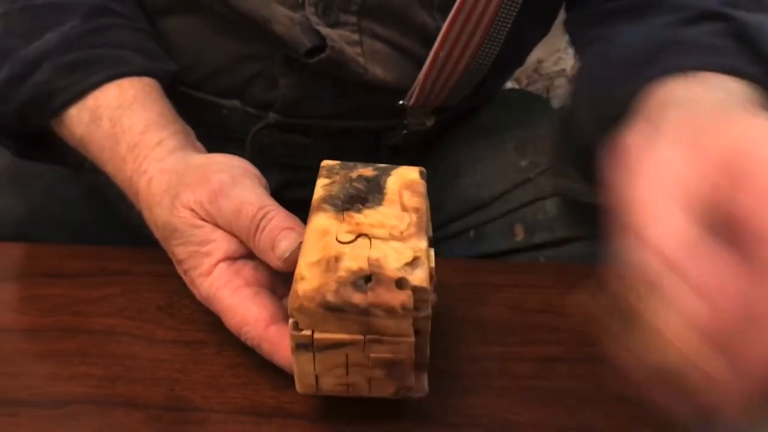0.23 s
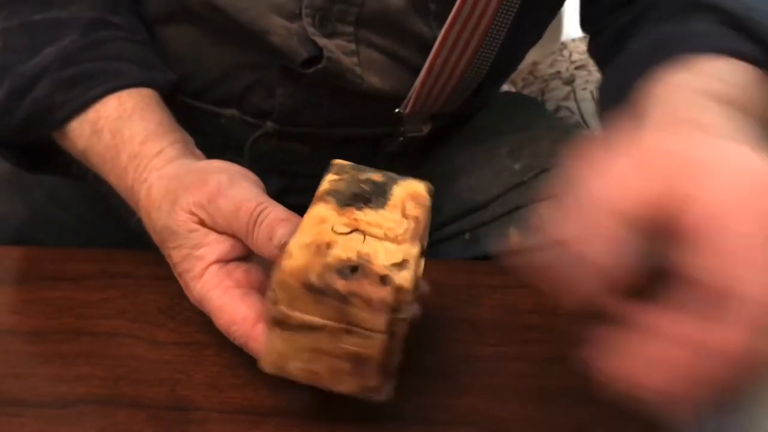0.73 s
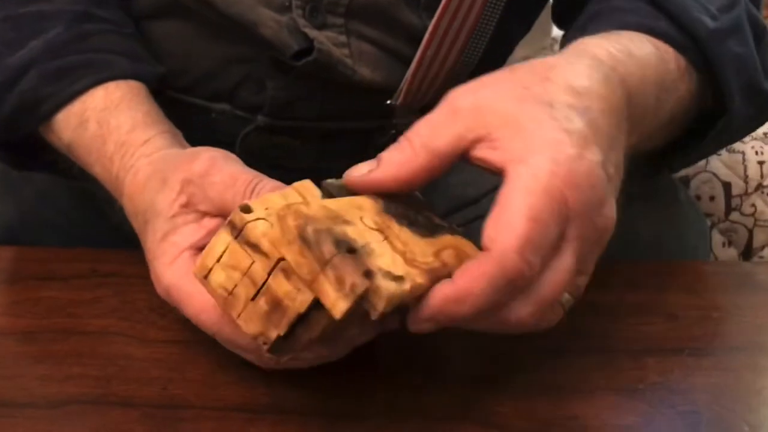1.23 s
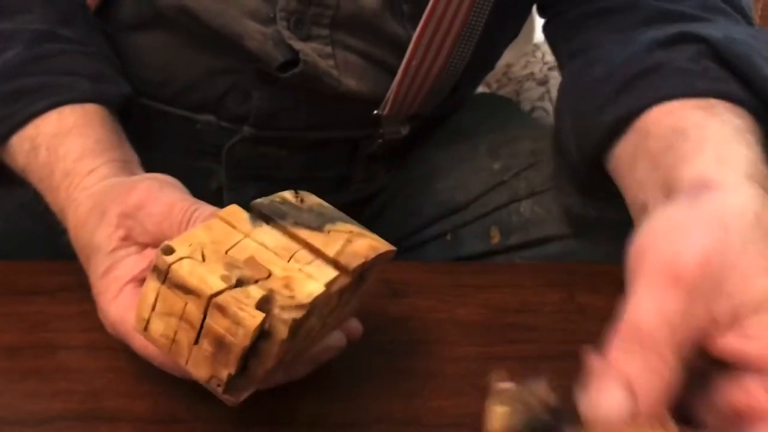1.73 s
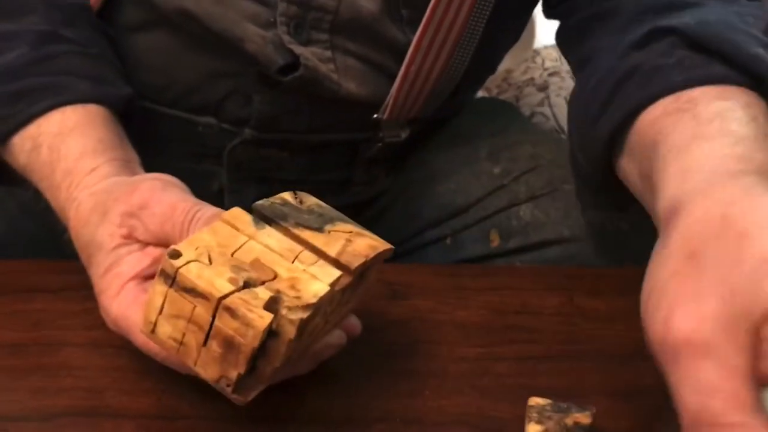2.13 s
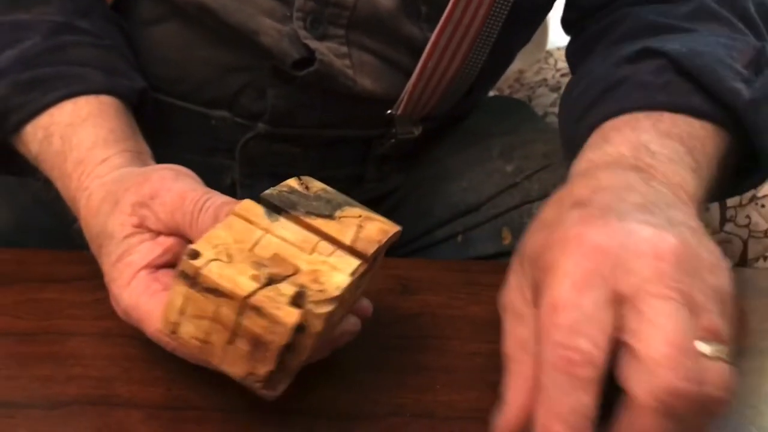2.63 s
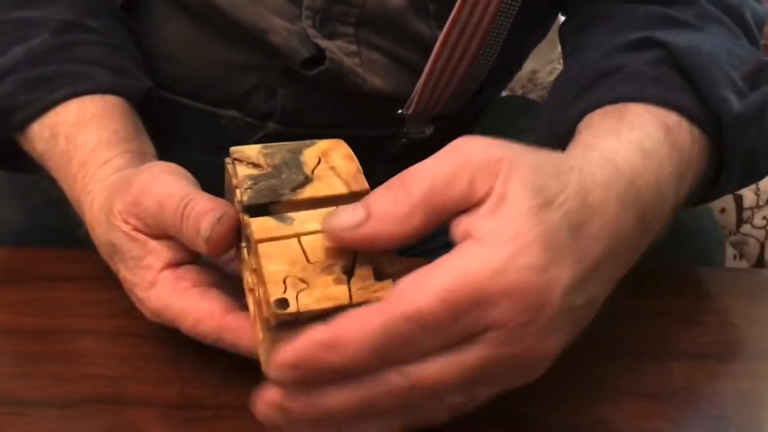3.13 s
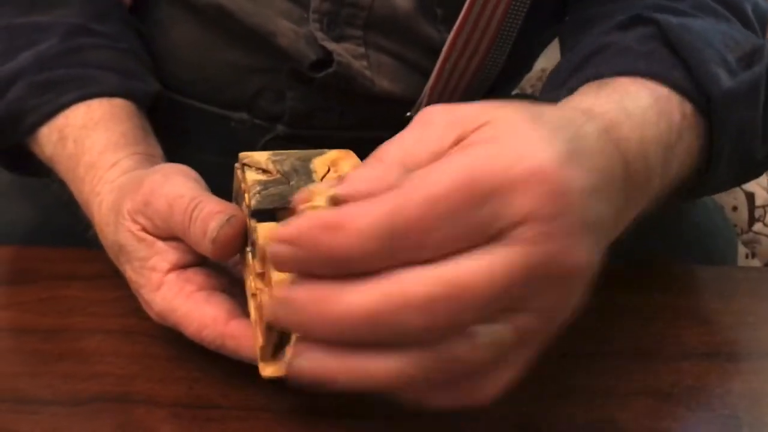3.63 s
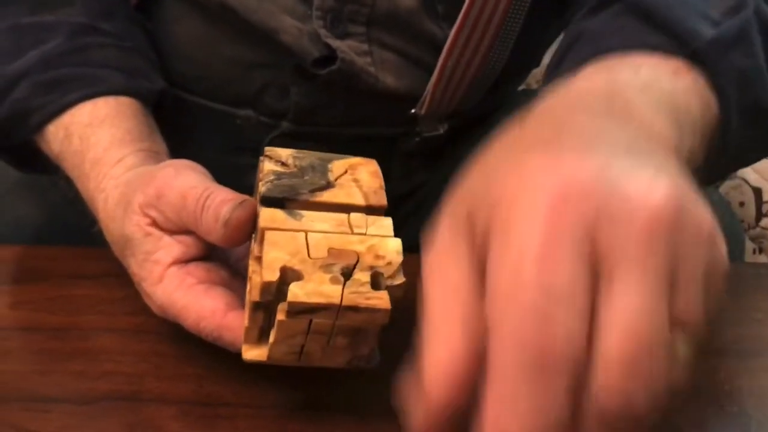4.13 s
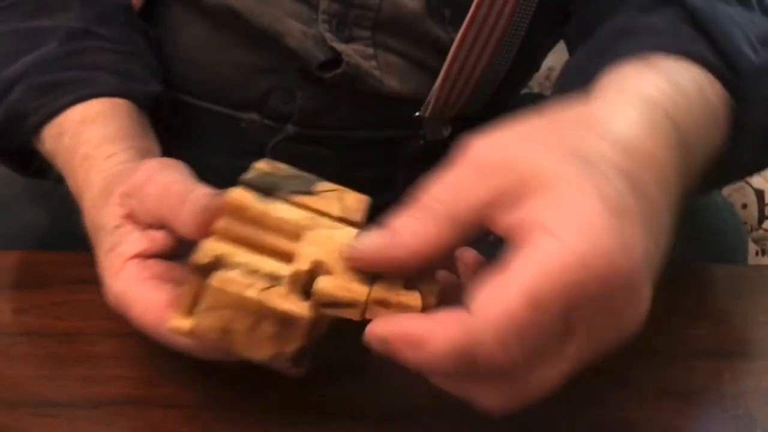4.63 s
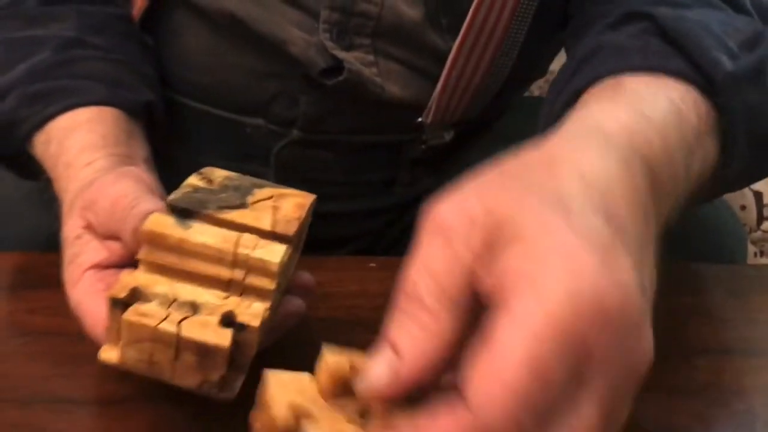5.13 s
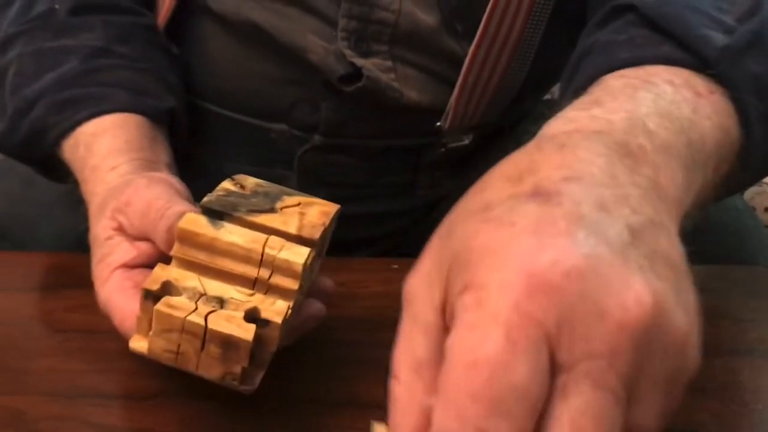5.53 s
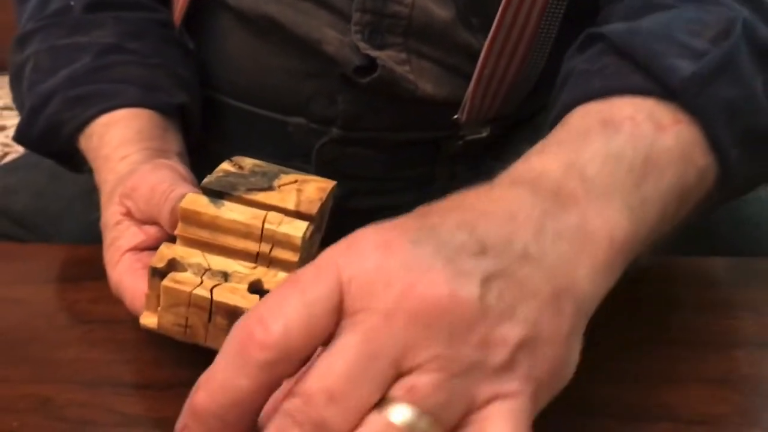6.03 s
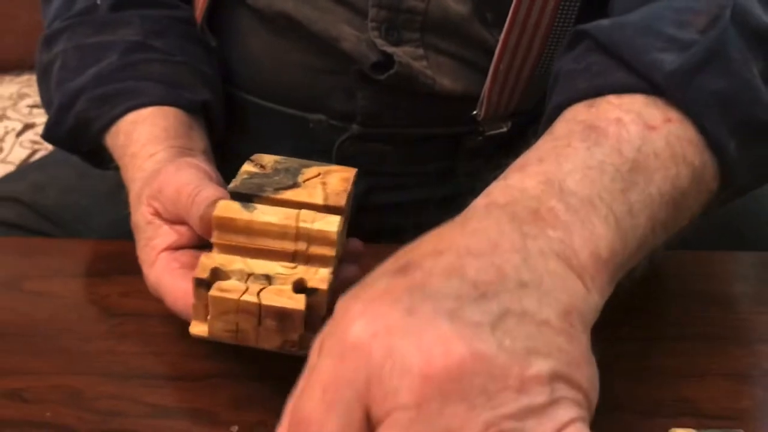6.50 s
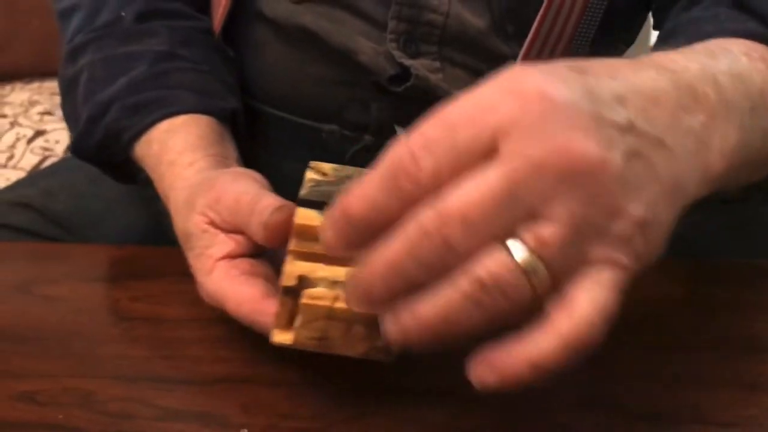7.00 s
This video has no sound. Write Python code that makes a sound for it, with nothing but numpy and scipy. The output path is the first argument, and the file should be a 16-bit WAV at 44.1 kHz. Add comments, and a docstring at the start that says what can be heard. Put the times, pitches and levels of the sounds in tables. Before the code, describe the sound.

Hands pull apart a small wooden puzzle over a wooden table. A few light clicks and brief scrapes lead to a quick clatter, then sharp knocks as a piece lands and bounces. More short bunches of clicks and clacks follow, separated by pauses with faint rubbing of wood, skin and sleeves. It sounds close, in a small room, with a soft low rumble underneath.

```python
"""Wooden puzzle blocks click together, land and bounce as hands pull them apart over a wooden table.
Each impact excites damped modes of the piece and the tabletop, and a small room reverberates.
Between impacts, friction of wood, skin and sleeve gives a soft hiss and short gritty strokes.
Underneath, the table murmurs below the hands, a rumble wavers, and jogs of table or arm swell deeply."""
import sys
import numpy as np
from scipy import signal
from scipy.fft import rfft, irfft, next_fast_len
from scipy.io import wavfile
from scipy.ndimage import uniform_filter1d, map_coordinates

SR = 44100
rng = np.random.default_rng(int(sys.argv[2]) if len(sys.argv) > 2 else 0)


def unload_audio(sound):
    """Save the sound as a 16-bit wav file, at the path given as the first command line argument."""
    columns = np.transpose(np.atleast_2d(sound))
    # keep every value between -1 and 1, then stretch to whole-number steps
    steps = np.round(np.clip(columns, -1, 1) * 32767)
    wavfile.write(sys.argv[1], SR, steps.astype(np.int16))


N = 320166

# Handling. Each row: time in seconds, then levels in dB of wood on wood, skin on wood and sleeve hiss.
RUB_LEVELS = [(0.0, -78, -85, -85), (0.34, -77.5, -74.5, -72.5), (0.83, -71, -84, -81),
              (1.21, -77, -68, -75), (1.48, -66, -68, -82), (1.6, -68, -76, -65), (1.84, -72.5, -77.5, -78),
              (2.45, -71, -76, -79), (2.69, -71.5, -79.5, -76.5), (3.19, -74.5, -70, -73),
              (3.46, -72, -64, -67.5), (4.33, -76.5, -83.5, -85.5), (4.49, -77.5, -69, -68.5),
              (4.77, -68, -82.5, -85), (5.09, -78.5, -78.5, -78), (5.28, -69.5, -73, -76),
              (5.96, -70, -79, -93), (6.41, -76, -70.5, -72), (6.81, -72.5, -85.5, -88),
              (7.26, -83.5, -78, -85)]
# The table under the hands. Each row: time in seconds, murmur level in dB.
MURMUR_LEVELS = [(0.0, -78.5), (0.36, -78), (0.51, -70), (1.11, -78.5), (1.62, -60), (2.04, -66.5),
                 (2.3, -65), (2.55, -68.5), (2.75, -69), (3.62, -72), (4.04, -72.5), (4.51, -74.5),
                 (5.11, -78), (5.26, -72.5), (6.41, -72), (7.26, -80)]
# Noise spectra. Each row: frequency in Hz, relative spectral density in dB.
SLIDE_SPECTRUM = [(400, -20.5), (800, 0), (1500, 0), (2600, 0), (3600, -7), (5000, -12.5)]
RUMBLE_SPECTRUM = [(12, -21.5), (25, -1.5), (40, 5.5), (60, -0.5), (90, -5), (130, -34.5)]
MURMUR_SPECTRUM = [(80, -15.5), (150, -1), (180, 2), (215, -8), (300, -6), (400, -12.5), (700, -18.5),
                   (1000, -47.5)]
# Resonances of skin on wood and of fine skin and sleeve hiss. Each row: centre in Hz, width in Hz,
# gain in dB.
SKIN_PEAKS = [(4130, 3300, -8.5), (5730, 870, -3.5), (6300, 620, -2), (7320, 770, -9)]
HISS_PEAKS = [(8100, 690, -0.5), (9550, 1100, 0.5), (11300, 660, -0.5), (12800, 1600, -10.5)]
# A piece or finger drawn along wood. Each row: start in seconds, length in seconds, then level in dB
# and centre in Hz for each of the low, middle and high bands.
STROKES = [(0.079, 0.23, -74.5, 2820, -74, 7160, -69.5, 10100),
           (0.843, 0.14, -62.5, 1790, -74, 4440, -67, 9600),
           (1.033, 0.071, -64.5, 2580, -62, 4770, -61, 9700),
           (1.189, 0.18, -59.5, 1170, -59, 4570, -58, 9800),
           (1.293, 0.061, -56, 2540, -76, 4240, -56.5, 10000),
           (1.358, 0.095, -60, 2580, -62.5, 4760, -61.5, 9500),
           (1.452, 0.074, -83, 2410, -70, 5430, -61, 11300),
           (1.792, 0.055, -84, 1540, -73, 4820, -74, 9470), (2.102, 0.017, -68, 1550, -62, 5050, -84, 8500),
           (2.159, 0.036, -81, 1380, -68.5, 4850, -83.5, 8270),
           (2.46, 0.17, -62, 1120, -67, 5100, -62, 9650),
           (2.895, 0.11, -71.5, 1610, -74.5, 3940, -67, 9100),
           (4.274, 0.081, -68.5, 1060, -72, 5870, -76, 8400),
           (4.32, 0.082, -70.5, 3750, -62, 5510, -60.5, 7840),
           (4.386, 0.036, -63.5, 3620, -62, 5500, -69, 8200),
           (4.443, 0.018, -74, 3100, -51, 5770, -60, 8000),
           (4.447, 0.085, -69.5, 1380, -63.5, 5900, -62.5, 8300),
           (4.499, 0.048, -66.5, 895, -67.5, 4740, -70, 11370),
           (4.556, 0.044, -68, 1220, -52.5, 5630, -52, 10800),
           (4.576, 0.078, -72, 3620, -61, 6700, -63, 11370),
           (4.762, 0.15, -66, 1570, -93, 4200, -101, 9500),
           (5.003, 0.091, -95.5, 2600, -75, 6400, -71, 11020),
           (6.102, 0.047, -71, 3100, -73, 6300, -74, 9200),
           (6.643, 0.053, -71.5, 1200, -93, 4460, -92, 9300),
           (7.013, 0.067, -83.5, 2590, -76.5, 4300, -87.5, 9020),
           (7.123, 0.043, -92.5, 1035, -77, 5190, -89.5, 8400)]
# Jogs of the table or an arm. Each row: time of the crest in seconds, level in dB.
JOGS = [(0.241, -84), (0.42, -63), (1.29, -62), (1.43, -43.5), (1.485, -48.5), (1.6, -49), (1.7, -54),
        (1.8, -51), (2.06, -53), (2.53, -59), (2.771, -73), (3.35, -80), (3.659, -57), (3.97, -45.5),
        (6.57, -54.5), (6.75, -67)]
# Impacts. Each row: start in seconds, nominal peak in dB, low and high emphasised frequencies in Hz,
# then relative drive in dB of 4-7 kHz, of 8-12 kHz, of the table's middle modes and of its boom.
IMPACTS = [(0.3687, -48.5, 3340, 9350, -7, -12, -6, -0.5), (0.3978, -46, 1690, 8700, -19, -16, -4, -34),
           (0.431, -43, 1690, 10700, -29, -10, -9, -21), (0.443, -23, 3200, 9020, -7.5, -4.5, -15.5, -45),
           (0.4751, -32, 3080, 9000, -8, -19, -17, -19), (0.4813, -29.5, 2950, 9250, -6, -8.5, -27, -37),
           (0.4892, -33, 3060, 10000, -15, -10, -6.5, -35), (0.4987, -32, 2940, 4400, -9, -17, -28, -15),
           (0.5107, -33, 2560, 9100, -4, -8, -11.5, -28), (0.9628, -38.5, 2560, 4330, -6.5, -14, -15, -27),
           (1.0267, -43.5, 2560, 4600, 3, -27, -29, -40), (1.0542, -33.5, 2640, 4370, 5, -7, -21, -51),
           (1.1706, -51, 1340, 11300, -20, -18, 4.5, -8), (1.265, -46.5, 1500, 4500, -12.5, -25, -2, -19.5),
           (1.2939, -31.5, 3420, 4220, 4.5, -10, -12, -29.5),
           (1.3, -15.5, 2150, 4300, -35, -43.5, -18.5, -30),
           (1.4103, -41.5, 1550, 5550, -1.5, -24, -8.5, -17),
           (1.4375, -24.5, 2320, 4220, -15, -28.5, -12, -19),
           (1.4833, -37, 2500, 5500, 2.5, -16.5, -17, -20.5),
           (1.504, -51.5, 1010, 10180, -10, 6, -9.5, -31),
           (1.5118, -40.5, 1080, 9560, -19.5, -19.5, -19.5, -28),
           (1.542, -44, 1020, 4400, 6.5, -12.5, -4, -12.5), (1.5714, -17, 2010, 4500, -10, -14, 2.5, -6.5),
           (1.6012, -11, 1240, 4330, -6.5, -24, -12.5, -31.5),
           (1.6214, -14, 2240, 4340, -8.5, -19.5, -26, -20.5),
           (1.644, -19, 2120, 4300, -21, -21.5, -11, -28), (1.6633, -29.5, 1140, 4310, -16, -23, -16, -25),
           (1.682, -24, 2350, 5320, -15, -18, -12, -20.5), (1.6887, -17, 2050, 4420, -11.5, -38, -16, -24),
           (1.7018, -28.5, 2430, 4330, -17, -42, -0.5, -18), (1.71, -34, 2720, 4860, -3, -30, -26, -19),
           (1.73, -30.5, 1470, 5130, -14, -47, -6, -3), (2.0431, -21, 1320, 5000, -16, -19, -2.5, -11),
           (2.0609, -35.5, 1730, 4500, -32.5, -25.5, -1, -31),
           (2.2206, -9.5, 2920, 8500, -1.5, -15, -15, -18.5),
           (2.2759, -10, 3880, 5040, -16, -24, -16, -30.5), (2.2911, -29, 2150, 4300, -3, -19, -10.5, -15),
           (2.306, -30, 1420, 4290, -12, -17, -25.5, -32), (2.3705, -49, 3500, 11000, 9, -7, -16, -19),
           (2.434, -27, 2700, 5400, -19.5, -23, -5, -14.5), (2.461, -44, 1100, 4500, -20, -30, 12, 2),
           (2.6546, -38, 1110, 5400, -12, -44, -4.5, -5), (2.676, -53, 1110, 4500, -10, -32, 4, 12),
           (3.318, -45.5, 1620, 8700, 1, -5, -11, -17), (3.5196, -32, 3680, 4250, 1, -14, -21, -45),
           (3.938, -26, 3010, 7200, -15, -17, -20.5, -25), (3.956, -11.5, 2770, 4560, 5, 3, -26, -34.5),
           (3.9886, -33, 2580, 5560, -11, -3, -25.5, -16), (3.995, -24.5, 2540, 7190, 6, -3.5, -16.5, -47),
           (4.002, -38.5, 2500, 5000, 5, 2, -19.5, -31), (4.028, -24.5, 2100, 6960, 9.5, 0.5, -19, -27.5),
           (4.0322, -31, 3730, 4540, -14, -39, -18.5, -19), (4.06, -35, 2640, 4700, -4, -12, -21, -57),
           (4.406, -36, 3260, 5400, 7, -10.5, -58, -38), (4.415, -46.5, 2160, 4220, -16, -15, -23, -36),
           (4.449, -48, 1310, 5500, 13, 12, -21, -44), (5.1428, -13, 2500, 6230, -13, -28, -11.5, -24),
           (5.155, -19.5, 2630, 6350, -7, -14.5, -13.5, -14.5),
           (5.1689, -18.5, 1640, 6200, -5.5, -17.5, -12.5, -46.5),
           (5.2921, -37, 1500, 4220, -27, -27, -2.5, -19), (5.301, -41.5, 2900, 4210, -25, -31, 0.5, -13.5),
           (5.339, -42, 1500, 7000, -11, -19, -8.5, -32.5),
           (5.6306, -20.5, 3440, 5740, -15.5, -16.5, -21, -20.5),
           (5.6337, -15, 2540, 5750, -3, -31, -18.5, -33.5), (5.6474, -17.5, 3880, 4520, -2, -6, -18, -25),
           (5.6557, -32, 1400, 5320, -11, -28.5, -15.5, -27), (5.688, -14, 2960, 5100, 0, -43, -33, -27.5),
           (5.706, -30, 3400, 4300, -6, -9, -10, -33), (5.7179, -26, 3830, 4570, -5, -16.5, -15, -22),
           (6.0108, -44, 1510, 7340, -12, -14, -0.5, -8), (6.269, -44, 1420, 9260, -19, -24, 4.5, -4),
           (6.414, -54.5, 1240, 4500, -7, -17, 1, -14), (6.4745, -26.5, 1440, 5490, 0.5, -18, -13.5, -21.5),
           (6.4947, -37, 1350, 5360, -16, -22, -30, -14)]
# Modes of a piece and of the tabletop. Each row: frequency in Hz, gain in dB, 60 dB decay in seconds.
PIECE_MODES = [(1140, -9.5, 0.031), (1432, 6, 0.033), (1730, 9, 0.018), (2140, 5, .025), (2560, 3, 0.045),
               (2820, 2.5, 0.027), (3100, 0.5, 0.036), (3448, 4, 0.014), (3924, 5.5, 0.026),
               (4500, 6.5, 0.014), (5075, 6, 0.0044), (6460, -11.5, 0.013), (6870, -14.5, 0.011),
               (7800, -3, 0.0077), (8490, 5.5, 0.0082), (10160, -6, 0.0023)]
TABLE_MID_MODES = [(445, -4, 0.038), (533, -8.5, 0.025), (637, 1.5, 0.04), (730, -10, 0.034),
                   (830, -8.5, 0.041), (891, -9.5, 0.075), (1055, -6, 0.08)]
TABLE_BOOM_MODES = [(110, -8, 0.08), (179.4, -7.5, 0.49), (190.1, -1, .2), (212.4, -3, 0.11),
                    (277.6, -5, 0.12), (331, -5.5, 0.073), (398, -3.5, 0.053)]
# Room reverberation. Each row: frequency in Hz, 60 dB decay in seconds.
ROOM_T60 = [(200, 0.7), (700, .34), (1900, 0.29), (4800, 0.17), (12000, 0.094)]
# Microphone response. Each row: frequency in Hz, gain in dB.
MICROPHONE = [(1000, 0), (4300, 0.5), (4900, -2.5), (5500, 1), (6000, -5), (6600, -3), (7700, -2.5),
              (8400, -3), (8800, 0.5), (9400, 0), (10400, -5.5), (11300, -3.5), (12500, -7), (14000, -7),
              (16400, -17.5)]


def amp(db):
    """Decibels to amplitude ratio."""
    return 10 ** (np.asarray(db) / 20)


def unit(x):
    """Normalisation to rms 1."""
    return x / np.sqrt(np.mean(x ** 2) + 1e-20)


def along(points, hz):
    """Interpolation of (Hz, value) points on a logarithmic frequency axis."""
    point_hz, values = np.transpose(points)
    return np.interp(np.log(hz + 1), np.log(point_hz + 1), values)


def curves(rows):
    """Linear interpolation, per sample, of each column after the time."""
    times, *columns = np.transpose(rows)
    return [np.interp(np.arange(N) / SR, times, column) for column in columns]


def wobble(rate):
    """A smooth random curve with rate knots a second."""
    return map_coordinates(rng.standard_normal(int(N * rate / SR) + 4), [np.arange(N) * rate / SR])


def filtered(x, response):
    """Linear filtering: the spectrum is multiplied by a frequency response."""
    size = next_fast_len(N + SR // 2)
    return irfft(rfft(x, size) * response(np.fft.rfftfreq(size, 1 / SR)), size)[..., :N]


def resonance(f, hz, width):
    """Band-pass response of a damped oscillator."""
    return 1j * f * width / (hz * hz - f * f + 1j * f * width)


def peaks(modes):
    """Response of resonators in parallel, alternating in polarity."""
    return lambda f: sum((-1) ** k * amp(db) * resonance(f, hz, width)
                         for k, (hz, width, db) in enumerate(modes))


def place(starts, rows):
    """Superposition of sounds at their starts in seconds."""
    at = np.round(starts * SR).astype(int) + np.arange(rows.shape[1])
    return np.bincount(at.ravel(), rows.ravel(), N + SR)[:N]


def friction(response, grit_db, patchy_db):
    """Friction noise of rms 1: fibres catch unevenly, and the spectrum shifts as the grip moves."""
    catches = rng.standard_normal(N) * amp(grit_db * wobble(220))
    spectra = signal.stft(catches, nperseg=256)[2]
    patches = uniform_filter1d(rng.standard_normal(spectra.shape), size=4, axis=0)
    patches = unit(uniform_filter1d(patches, size=14, axis=1))
    patched = signal.istft(spectra * amp(patchy_db * patches), nperseg=256)[1][:N]
    return unit(filtered(patched, response))


def rubbing():
    """Sliding friction: wood on wood gives broad noise, skin and sleeves hiss in resonant bands."""
    slide_db, skin_db, hiss_db = curves(RUB_LEVELS)
    slide = amp(slide_db) * friction(lambda f: amp(along(SLIDE_SPECTRUM, f)), grit_db=1.0, patchy_db=2.5)
    skin = amp(skin_db) * friction(peaks(SKIN_PEAKS), grit_db=-0.5, patchy_db=-0.5)
    hiss = amp(hiss_db) * friction(peaks(HISS_PEAKS), grit_db=1.0, patchy_db=2.5)
    return slide + skin + hiss


def rumble():
    """Random amplitude modulation makes a deep noise waver."""
    level = amp(-68.5 + 2.5 * wobble(rate=8.9))
    return level * friction(lambda f: amp(along(RUMBLE_SPECTRUM, f)), grit_db=-0.2, patchy_db=2.5)


def table_murmur():
    """Forced vibration: moving hands drive the table with low noise."""
    level = amp(curves(MURMUR_LEVELS)[0])
    return level * friction(lambda f: amp(along(MURMUR_SPECTRUM, f)), grit_db=0.8, patchy_db=1.0)


def strokes():
    """Friction excites three resonances of the contact as each stroke swells and stops."""
    start, length, *bands = np.transpose(STROKES)[:, :, None]
    t = np.arange(SR // 4) / SR
    f = np.fft.rfftfreq(len(t), 1 / SR)
    swell = np.sin(np.pi * np.clip(t / length, 0, 1) ** 0.89) ** 0.71
    grit = amp(23 * uniform_filter1d(rng.standard_normal((len(start), len(t))), size=100, axis=1))
    ripple = uniform_filter1d(rng.standard_normal((len(start), len(f))), size=90, axis=1)
    grip_colour = amp(2.5 * unit(ripple))  # every grip favours other pitches
    relative_widths, tilts = (.4, .05, .08), (.1, .3, 2.6)
    rows = 0
    for db, hz, width, tilt in zip(bands[::2], bands[1::2], relative_widths, tilts):
        narrow, broad = resonance(f, hz, width * hz), resonance(f, hz, 7 * width * hz)
        response = (narrow + .5 * broad * (f / hz) ** tilt) * broad * grip_colour
        band = irfft(rfft(grit * rng.standard_normal(grit.shape)) * response, len(t))
        rows = rows + amp(db) * band / band.std(axis=1, keepdims=True)
    return place(start, swell * rows)


def jogs():
    """A jogged table or arm sways: a deep oscillation grows and decays exponentially."""
    lead_s, rise_s, fall_s, sway_hz = .1, 0.018, .05, 42
    crest, db = np.transpose(JOGS)[:, :, None]
    t = np.arange(SR // 2) / SR - lead_s
    swell = np.exp(np.where(t < 0, t / rise_s, -t / fall_s))
    detune, phase = rng.standard_normal((len(crest), 2)).T[:, :, None]
    sway = np.cos(2 * np.pi * sway_hz * (1 + .15 * detune) * t + phase)
    return place(crest - lead_s, amp(db) * swell * sway)


def blow_spectrum_db(f):
    """Excitation spectrum, one row per impact: a low hump crosses over to a peaked treble shelf."""
    low_hz, high_hz, bright_db, sheen_db, mids_db = np.transpose(IMPACTS)[2:7, :, None]
    hump = 5 * np.exp(-(np.log(f / low_hz) / 0.17) ** 2) - 5 * np.abs(np.log2(f / low_hz))
    shelf = bright_db + np.clip((f - 6500) / 2000, 0, 1) * (sheen_db - bright_db)
    peak = 9 * np.exp(-(np.log(f / high_hz) / .05) ** 2)
    treble = shelf + peak - 5.5 * np.clip(f / 1000 - 11.5, 0, None)
    crossover = np.clip((f - 3700) / 700, 0, 1)
    body = (mids_db + 1.0) * np.clip(np.log2(1100 / f), 0, 1.5)
    return hump + crossover * (treble - hump) + body


def ringing(modes, blow_db, t, scatter_db, detune):
    """Free vibration, one row per blow: a sum of damped modes, each shifted a little by the grip."""
    hz, db, t60 = np.transpose(modes)
    loudness, polarity, shift = rng.standard_normal((len(blow_db), 3, len(hz))).swapaxes(0, 1)
    strength = amp(db + blow_db + scatter_db * loudness) * np.sign(polarity)
    phase = 2 * np.pi * (hz * (1 + detune * shift))[:, :, None] * t
    partials = amp(-60 * t / t60[:, None]) * np.sin(phase.astype(np.float32))
    return (strength[:, None] @ partials)[:, 0]


def clacks(t):
    """Impulse response of each struck piece: the direct sound and the sound radiated into the room."""
    size = len(t)
    cepstrum = irfft(np.log(amp(blow_spectrum_db(np.fft.rfftfreq(size, 1 / SR) + 1))))
    causal = np.r_[1, np.full(size // 2 - 1, 2), np.zeros(size // 2)]
    colour = np.exp(rfft(cepstrum * causal))  # minimum phase
    late = t - .002  # the sound returns scattered from the hands and the tabletop
    scatter = 0.35 * amp(-60 * t / 0.01) + 0.51 * (late > 0) * amp(-60 * np.abs(late) / 0.004)
    jolt = (t == 0) + scatter * rng.standard_normal((len(IMPACTS), size))
    drive_db = blow_spectrum_db(np.transpose(PIECE_MODES)[0])
    ring = amp(-26.5) * ringing(PIECE_MODES, drive_db, t, scatter_db=2.8, detune=0.025)
    direct = irfft(rfft(jolt) * colour) + ring
    radiated = 1.38 * irfft(colour) + 0.41 * ring  # smoother, being averaged over all directions
    nominal_peak = 0.24 * np.linalg.norm(direct, axis=1, keepdims=True)
    return direct / nominal_peak, radiated / nominal_peak


def room(rows, t):
    """Reverberation: each blow has its own diffuse tail, each frequency its own decay rate."""
    hz, times, spectra = signal.stft(rng.standard_normal(rows.shape), SR, nperseg=128)
    decay = amp(-60 * times / along(ROOM_T60, hz)[:, None])
    tail = signal.istft(spectra * decay, SR, nperseg=128)[1][:, :len(t)]
    tail = tail * np.clip(t / 0.004, 0, 1) / np.linalg.norm(tail, axis=1).mean()
    return signal.fftconvolve(rows, tail, axes=1)[:, :len(t)]


def impacts():
    """Impact excitation: each contact clacks the piece, sets the tabletop ringing and fills the room."""
    start, db, *_, mids_db, boom_db = np.transpose(IMPACTS)[:, :, None]
    t = np.arange(int(.36 * SR)) / SR
    direct, radiated = clacks(t[:2048])
    board = amp(-11.5) * ringing(TABLE_MID_MODES, mids_db, t[:len(t) // 2], scatter_db=3.3, detune=0.035)
    boom = amp(-4.5) * ringing(TABLE_BOOM_MODES, boom_db, t, scatter_db=2.44, detune=0.018)
    boom *= 1 - np.exp(-t / 0.004)
    direct, radiated, board = (np.pad(x, ((0, 0), (0, len(t) - x.shape[1])))
                               for x in (direct, radiated, board))
    room_db = -0.5 + 0.04 * mids_db  # dull landings on the table fill the room more
    reverberation = amp(room_db) * room(radiated + 0.51 * board, t)
    return place(start, amp(db) * (direct + board + boom + reverberation))


def scene():
    """Superposition of all sources at one microphone."""
    return (impacts() + strokes() + rubbing() + jogs() + rumble() + table_murmur())[None]


def record(dry):
    """Band limiting: the microphone dulls the treble, and the recorder passes nothing above 16.5 kHz."""
    return filtered(dry, lambda hz: amp(along(MICROPHONE, hz)) * (hz < 16500))


dry = scene()
out = record(dry)
unload_audio(out)
```